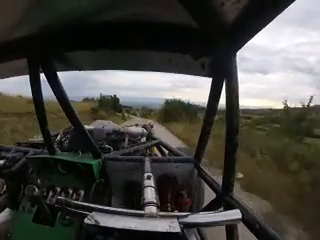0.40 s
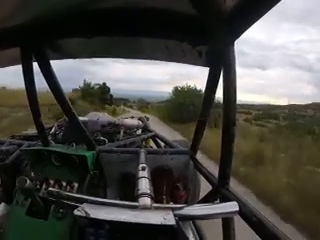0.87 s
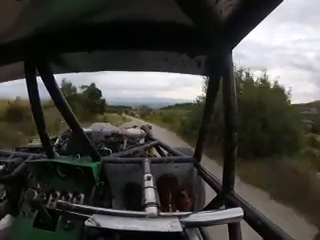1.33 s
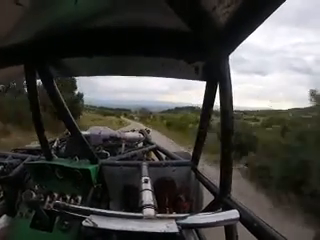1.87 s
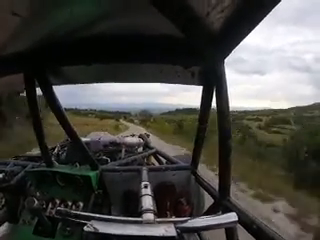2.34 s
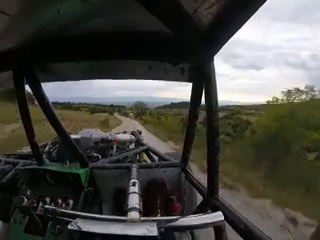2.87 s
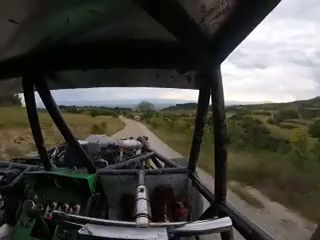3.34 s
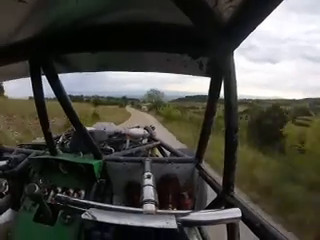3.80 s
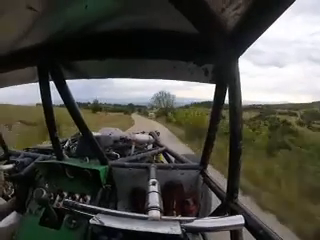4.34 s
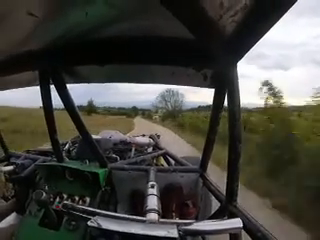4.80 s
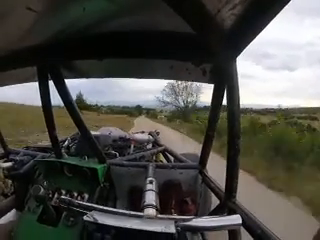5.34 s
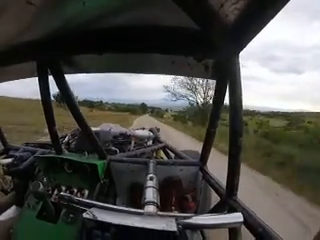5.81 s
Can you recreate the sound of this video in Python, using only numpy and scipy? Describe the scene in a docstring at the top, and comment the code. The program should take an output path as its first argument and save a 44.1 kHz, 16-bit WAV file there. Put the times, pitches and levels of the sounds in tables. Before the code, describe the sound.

Lumpy wind buffeting with thumps and sharp pops covers a faint hissing, whistling engine, which finally swells into a rough low drone.

```python
"""Headwind buffets a microphone on the roll cage of a turbocharged V8 buggy on a dirt track.
Wind: gust-shaped noise in three bands, plus timed spikes, pressure jumps and low thumps.
Engine: filtered noise hisses in ducts, blurred tones whistle and drone; the throttle opens near the end.
Drivetrain: thin blurred tones whine and squeak. Grit: single filtered impulses tick on the cage."""
import sys
import numpy as np
from scipy import signal
from scipy.fft import rfft, irfft, next_fast_len
from scipy.io import wavfile
from scipy.ndimage import map_coordinates

SR = 44100
rng = np.random.default_rng(int(sys.argv[2]) if len(sys.argv) > 2 else 0)


def master(y):
    """Save y as 16-bit WAV."""
    cut = np.clip(np.atleast_2d(y).T, -1, 1)
    pcm = np.round(cut * 32767)  # scale
    wavfile.write(sys.argv[1], SR, pcm.astype(np.int16))


def ratio_of_db(decibels):
    """Turn decibels (scalar or array-like) into linear amplitude factors; 0 dB maps to 1."""
    return 10 ** (np.asarray(decibels, float) / 20)


N = 272085


def unit(x):
    """Scales x to rms 1."""
    return x / np.sqrt(np.mean(x ** 2) + 1e-20)


def along(points, hz):
    """Interpolates (frequency [Hz], value) points on a log frequency axis."""
    f, v = np.transpose(points)
    return np.interp(np.log(hz + 1), np.log(f + 1), v)


def curves(rows):
    """Gives one value per sample for each column after the time."""
    s, *cols = np.transpose(rows)
    return [np.interp(np.arange(N) / SR, s, c) for c in cols]


def wobble(rate_hz):
    """Draws a smooth random curve with rate_hz knots a second."""
    return map_coordinates(rng.standard_normal(N // 20), [np.arange(N) * rate_hz / SR])


def filtered(x, response):
    """Multiplies the spectrum of x by a function of frequency."""
    m = next_fast_len(N + 8192)
    return irfft(rfft(x, m) * response(np.fft.rfftfreq(m, 1 / SR)), m)[:N]


def coloured(x, spectrum):
    """Shapes x by a (frequency [Hz], gain [dB]) spectrum, then scales to rms 1."""
    return unit(filtered(x, lambda hz: ratio_of_db(along(spectrum, hz))))


def whine(rows, blur_hz, steady, fade=0.14, wander_hz=0):
    """Spreads a tone by random modulation around a steady core, with a linear fade at each end."""
    hz, db = curves(rows)
    t = np.arange(N) / SR
    fade_in = np.clip((t - rows[0][0]) / fade + 1, 0, 1)
    fade_out = np.clip((rows[-1][0] - t) / fade + 1, 0, 1)
    carrier = np.exp(2j * np.pi * np.cumsum(hz + wander_hz) / SR)
    shiver = (steady + wobble(blur_hz) + 1j * wobble(blur_hz)) * carrier
    return fade_in * fade_out * ratio_of_db(db) * unit(shiver.real)


# stones on the cage: (time [s], impulse level before the filter [dB])
STONES = [(1.2472, -40.5), (1.4183, -34), (2.5689, -44.5), (3.305, -38), (4.2963, -33), (4.404, -39.5),
          (4.4816, -32), (4.654, -39), (4.7599, -45), (4.8738, -32.5), (4.8974, -32.5), (4.907, -34.5),
          (4.972, -40), (5.0026, -41.5), (5.0982, -43.5)]


def grit():
    """Tiny stones tick once, with no ring: filtered impulses."""
    ticks = np.zeros(N)
    for s, db in STONES:
        ticks[round(s * SR)] = ratio_of_db(db)
    colour = [(1500, -38.0), (4000, -4), (9000, 4.0), (12000, -7.5)]
    return filtered(ticks, lambda hz: ratio_of_db(along(colour, hz)))


# pump tone: (time [s], frequency [Hz], level [dB])
PUMP_TONE = [(0, 1657, -62), (3.1, 1657, -62), (5.0, 1657, -64), (5.3, 1657, -80)]


def pump():
    """A pump holds one steady, barely blurred note."""
    return whine(PUMP_TONE, blur_hz=6, steady=4.5)


# air bleed notes: (time [s], length [s], start frequency [Hz], end frequency [Hz], level [dB])
BLEED_NOTES = [(2.76, .26, 5590, 5640, -70), (2.92, 0.36, 5350, 5550, -66), (3.112, .24, 5660, 5790, -67),
               (3.64, 0.3, 5600, 5780, -66), (4.072, 0.11, 5690, 5740, -71)]


def air_bleed():
    """Escaping air squeaks in short rising notes."""
    out = np.zeros(N)
    for s, length_s, start_hz, end_hz, db in BLEED_NOTES:
        note = [(s, start_hz, db), (s + length_s, end_hz, db)]
        out += whine(note, blur_hz=100, steady=.7, fade=.03)
    return out


# turbine tone: (time [s], frequency [Hz], level [dB])
TURBINE_TONE = [(5.3, 2235, -72), (5.5, 2250, -56), (5.8, 2245, -57), (6.0, 2250, -54), (6.17, 2280, -55)]


def turbine():
    """The turbine sings as a blurred line."""
    return whine(TURBINE_TONE, blur_hz=90, steady=.7)


# differential tone: (time [s], frequency [Hz], level [dB])
DIFFERENTIAL_TONE = [(5.2, 788, -52), (5.27, 796, -46), (5.36, 800, -51), (5.5, 805, -49), (5.7, 808, -49),
                     (5.85, 814, -46.5), (6.0, 818, -48), (6.17, 826, -46.5)]


def differential():
    """The differential hums as a blurred line."""
    return whine(DIFFERENTIAL_TONE, blur_hz=35, steady=1.5)


# gear mesh: (time [s], mesh frequency [Hz], level before line offset and swell [dB])
GEAR_TONE = [(0, 1977, -53.5), (.58, 1985, -52), (.65, 1985, -48.5), (.72, 1985, -52), (1.35, 1990, -51.5),
             (1.5, 1985, -56), (1.75, 2005, -54), (1.97, 2030, -54), (2.04, 2045, -49.5), (2.09, 2000, -47),
             (2.14, 2045, -52.5), (2.25, 2045, -55), (2.4, 2050, -59), (3.4, 2060, -57.5), (3.9, 2060, -58),
             (4.3, 2050, -62), (4.39, 2050, -70)]
# lines made by one swell per shaft turn: (offset from mesh frequency [Hz], level offset [dB])
GEAR_LINES = [(-88, -9), (-44, -5), (0, -1), (44, -10)]


def gear_mesh():
    """Meshing teeth whine in lines a shaft rate apart, sharing a slow wander and swell."""
    wander_hz = 7 * wobble(14)
    lines = np.zeros(N)
    for offset_hz, offset_db in GEAR_LINES:
        line = [(s, hz + offset_hz, db + offset_db) for s, hz, db in GEAR_TONE]
        lines += whine(line, blur_hz=60, steady=.6, wander_hz=wander_hz)
    return ratio_of_db(.7 * wobble(9.13)) * lines


def drivetrain():
    """Sums the gear, differential, turbine, bleed and pump tones."""
    return gear_mesh() + differential() + turbine() + air_bleed() + pump()


# cab boom under load: (time [s], frequency [Hz], level [dB])
BOOM_TONE = [(4.9, 223, -31.5), (5.3, 214.5, -41.5), (5.7, 221.2, -35.5), (6.0, 227, -34), (6.17, 237, -26)]


def boom():
    """The cab booms in a low blurred tone."""
    return whine(BOOM_TONE, blur_hz=30, steady=.6)


# exhaust firing note: (time [s], frequency [Hz], level [dB])
FIRING_TONE = [(4.95, 167.6, -31), (5.3, 170.3, -30.5), (5.38, 170.4, -38), (5.55, 171.6, -31.5),
               (5.7, 173.7, -33.5), (5.87, 174, -31), (6.17, 180.9, -30.5)]


def exhaust():
    """Regular firing drones as a nearly steady tone."""
    return whine(FIRING_TONE, blur_hz=12, steady=2.5)


# wide intake whistle: (time [s], frequency [Hz], level before flicker and dips [dB])
INTAKE_BAND = [(0.0, 6405, -66), (0.63, 6550, -58.5), (1.7, 6480, -64.5), (2.22, 6440, -59.5),
               (2.9, 6440, -63), (3.95, 6620, -65), (4.9, 6420, -63.5), (5.4, 6520, -75), (6.12, 6340, -75)]
# thin wandering line in it: (time [s], frequency [Hz], level before dips [dB])
INTAKE_THIN = [(0, 6340, -64), (.3, 6270, -71), (.7, 6500, -73), (1.0, 6320, -61), (1.45, 6380, -69),
               (1.9, 6330, -71), (2.1, 6460, -68), (2.3, 6350, -63), (2.6, 6500, -62), (2.95, 6570, -71),
               (3.9, 6640, -70), (4.35, 6480, -67), (4.9, 6400, -73), (5.3, 6450, -77)]


def intake():
    """The intake whistles as a wide flickering band plus a thin wandering line."""
    band = ratio_of_db(2.2 * wobble(40)) * whine(INTAKE_BAND, blur_hz=297.5, steady=.1)
    return band + whine(INTAKE_THIN, blur_hz=59.0, steady=.4)


def ring(x, ducts):
    """Adds resonant peaks to x; a duct's gain is divided by 3."""
    def response(hz):
        peaks = sum(ratio_of_db(db) / np.sqrt(1 + (2 * (hz - centre) / width) ** 4) for centre, width, db in ducts)
        return 1 + peaks / 3
    return filtered(x, response)


# throttle: (time [s], share pulling [0-1])
PULLING_SHARE = [(0, 0), (4.9, 0), (5.4, 0.53), (6.17, 0.72)]
# hiss colours, cruising and pulling, before scaling to rms 1: (frequency [Hz], density [dB per Hz])
CRUISING_COLOUR = [(530, -22), (900, -3), (1240, -6), (1700, -7.5), (1800, -12), (1970, -7), (2320, -9.5),
                   (4550, -15), (6030, -20), (6530, -20.5), (9020, -27.5), (9970, -39.5), (13000, -74.5),
                   (21900, -120)]
PULLING_COLOUR = [(530, -44), (900, 0.5), (1250, -5.5), (1430, -4.5), (1800, -9.5), (2200, -8), (2810, -12),
                  (3260, -14.5), (4110, -21.5), (5240, -23), (7230, -34.5), (9970, -48), (13000, -81.5),
                  (21900, -120)]
# panels and ducts, cruising and pulling: (frequency [Hz], width [Hz], gain before the division by 3 [dB])
CRUISING_DUCTS = [(3340, 91, -3), (4440, 41, 7), (4615, 25, 14), (6960, 69, 11.5), (1410, 130, -1),
                  (7200, 65, 4.5)]
PULLING_DUCTS = [(1050, 50, 3), (1370, 50, 5), (1470, 50, 6), (1916, 42, 2), (2120, 54, 4), (4750, 64, 15),
                 (5110, 62, 6), (7020, 80, 5.5)]


def hiss():
    """Valve-gear noise rings in the ducts; under load it changes colour, grows and pulses with each firing."""
    pulling, = curves(PULLING_SHARE)
    clatter = ratio_of_db(0.68 * wobble(60) + 0.65 * wobble(500)) * rng.standard_normal(N)
    firing_hz = curves(FIRING_TONE)[0]
    rasp = 1 + 0.4 * np.cos(2 * np.pi * np.cumsum(firing_hz) / SR)
    cruising = coloured(ring(clatter, CRUISING_DUCTS), CRUISING_COLOUR)
    loaded = coloured(rasp * ring(clatter, PULLING_DUCTS), PULLING_COLOUR)
    return ratio_of_db(-45) * ((1 - pulling) * cruising + ratio_of_db(7.5) * pulling * loaded)


# sudden drops of hiss and intake: (time [s], depth [dB], drop time [s])
LEVEL_DIPS = [(-.05, 1.5, 0.045), (1.42, 2, 0.036), (2.2, 6, 0.21), (4.34, 5, 0.03), (4.88, 5.5, 0.23)]


def dips():
    """Gain that drops quickly at each dip, then creeps back exponentially."""
    creep_s = 1
    t = np.arange(N) / SR
    loss_db = np.zeros(N)
    for s, depth_db, drop_s in LEVEL_DIPS:
        drop = np.clip((t - s) / drop_s, 0, 1)
        loss_db += depth_db * drop * np.exp(-np.clip(t - s - drop_s, 0, None) / creep_s)
    return ratio_of_db(-loss_db)


def engine():
    """Sums hiss and intake, both dipping, with the undipped exhaust note and boom."""
    return dips() * (hiss() + intake()) + exhaust() + boom()


# low thumps of big eddies: (onset time [s], envelope peak level [dB], frequency [Hz])
EDDY_THUMPS = [(0.069, -13.5, 45.3), (0.16, -10, 67.3), (0.592, -9, 53.8), (0.679, -6, 94.2),
               (0.767, -9, 135), (0.889, -6, 94.2), (0.981, -11, 48.6), (1.149, -7.5, 45.8),
               (1.235, -11, 213), (1.306, -9.5, 201), (1.353, -10, 80), (1.469, -9, 46.4),
               (1.699, -15, 67.3), (1.929, -8.5, 114), (2.104, -13.5, 96), (2.258, -6.5, 89.6),
               (2.526, -12.5, 45.8), (2.659, -10.5, 69), (3.03, -7.5, 75.4), (3.285, -9, 118),
               (3.706, -12.5, 76), (3.825, -8.5, 45.6), (3.929, -6.5, 70.0), (4.059, -15, 45),
               (4.258, -8, 97), (4.381, -7, 87), (4.469, -9.5, 61.9), (4.635, -11, 83), (4.748, -7, 45.6)]


def thumps():
    """Each big eddy swings the pressure for about one cycle, at a random phase."""
    rise_cycles, fall_cycles = 0.508, 0.62
    out, t = np.zeros(N + SR // 10), np.arange(SR // 10) / SR
    for (s, db, hz), turn in zip(EDDY_THUMPS, rng.uniform(size=len(EDDY_THUMPS))):
        cycles = t * hz - 2 * rise_cycles  # 0 at the envelope peak
        envelope = np.exp(-(cycles / np.where(cycles < 0, rise_cycles, fall_cycles)) ** 2)
        out[round(s * SR):][:len(t)] += ratio_of_db(db) * envelope * np.cos(2 * np.pi * (cycles + turn))
    return out[:N]


# pressure jumps of bursting eddies: (time [s], level before flip and easing [dB], flip time [s])
PRESSURE_JUMPS = [(0.988, -23, .00015), (1.512, -21, 0.00016), (2.545, -27, 0.00019), (2.8, -25.5, 0.00013),
                  (2.2116, -14, 0.00017), (2.409, -20, .00015), (3.1683, -18, 0.00013),
                  (3.219, -21, .00015), (3.258, -33, .0001), (3.3045, -18.5, 0.000065), (3.338, -24, .0001),
                  (3.371, -20.5, .00007), (3.511, -19, 0.00012), (3.838, -9.5, 0.00013),
                  (4.127, -18, .00012), (4.339, -26, 0.00013), (4.6715, -19.5, 0.00013),
                  (5.478, -20, 0.00018), (5.99, -31, .0002)]


def jumps():
    """Suction builds, flips to pressure within a fraction of a millisecond and eases off."""
    ease_s = .0008
    out, t = np.zeros(N + 1024), np.arange(-512, 512) / SR
    for s, db, flip_s in PRESSURE_JUMPS:
        out[round(s * SR):][:len(t)] += ratio_of_db(db) * np.tanh(t / flip_s) * np.exp(-np.abs(t) / ease_s)
    return out[512:N + 512]


def small_snaps():
    """Rows for weaker eddies at random moments, their level tied to the wind strength."""
    count = 25
    when = rng.uniform(size=count) * (N - 1)
    luck = rng.standard_normal((count, 3))
    spike_db = curves(WIND_STRENGTH)[0][when.astype(int)] - 9 + 5.5 * luck[:, 0]
    swing_db = -5.5 + 5 * luck[:, 1]
    crackle_db = -35.5 + 7 * luck[:, 2]
    return list(zip(when / SR, spike_db, swing_db, crackle_db))


def cusp(t, rise_s, fall_s):
    """A pointed pulse: exponential rise to 1 at t = 0, exponential fall after."""
    return np.exp(np.where(t < 0, t / rise_s, -t / fall_s))


# sharpest eddies, before the port filter:
# (time [s], spike level [dB], swing over spike [dB], crackle over spike [dB])
SHARP_SNAPS = [(0.0824, -17.5, 7, -31), (0.1676, -25.5, -5, -30), (0.2119, -14, -1, -34),
               (0.297, -21, -3, -32), (0.4021, -16, -5, -46), (0.4198, -14.5, -4.5, -34),
               (0.567, -18, -6, -36), (0.611, -16.5, 1.5, -36), (0.652, -15.5, -7, -31),
               (0.6874, -13, 6.5, -40), (0.71, -24, -2, -38), (0.769, -15.5, -3, -34),
               (0.785, -20, 3.5, -38), (0.8, -12.5, 1, -32), (0.892, -20.5, -3, -35), (0.902, -17, 6, -43),
               (0.9863, -11, -4, -35), (0.998, -12.5, 8, -33), (1.062, -21, -3, -35),
               (1.155, -17.5, -3, -39), (1.1687, -19.5, 10.5, -36), (1.2655, -17.5, 9, -45),
               (1.329, -9.5, 1, -34), (1.3799, -15.5, -5.5, -31), (1.459, -22, 7, -36),
               (1.482, -23, -2.5, -39), (1.5105, -10.5, -5, -42), (1.55, -20.5, 1, -36),
               (1.59, -23.5, 5.5, -36), (1.635, -17, -3.5, -24.5), (1.7203, -12, -3, -35.5),
               (1.7951, -16.5, -8.5, -35), (1.822, -18, 5, -34.5), (1.867, -18.5, 4, -31),
               (1.918, -20.5, -1, -35), (2.021, -15.5, -17, -26), (2.062, -17, -9, -28),
               (2.1106, -12, -8, -52), (2.1298, -16, -2.5, -36), (2.1675, -12, -17, -24.5),
               (2.182, -13.5, -12.5, -31.5), (2.213, -10, -7.5, -29.5), (2.255, -25.5, -3, -27),
               (2.2754, -11, 3.5, -25), (2.289, -22, -7, -23), (2.3235, -17, 4, -30), (2.35, -19, -11, -34),
               (2.3745, -22.5, -4, -32), (2.4088, -12.5, -2, -29), (2.428, -20, -13, -27),
               (2.4885, -18.5, -10, -25.5), (2.514, -26.5, 0.5, -34), (2.544, -16.5, -8, -39),
               (2.5867, -24, 14, -21.5), (2.6536, -15, -2, -29), (2.681, -22, -10, -19),
               (2.733, -17.5, -7, -32.5), (2.7535, -16.5, -3, -26), (2.798, -16.5, -16, -33),
               (2.8472, -18.5, -13, -28), (2.8962, -14.5, 1, -31), (2.956, -27, -23, -8),
               (3.0414, -15, 8, -20), (3.092, -19, -5, -24), (3.166, -7.5, -4.5, -23),
               (3.195, -17, -1.5, -28), (3.2163, -13.5, -11, -28), (3.246, -17.5, -1, -30),
               (3.299, -10.5, -12, -27.5), (3.303, -12, 5.5, -24), (3.322, -17.5, -13, -17),
               (3.335, -28, -21, -16.5), (3.3667, -13.5, 4.5, -29), (3.4065, -21, -4.5, -16.5),
               (3.42, -23.5, -10, -24.5), (3.463, -15.5, 2.5, -27.5), (3.472, -16, -5, -23.5),
               (3.509, -14, -15, -25.5), (3.555, -35, -4, -30), (3.585, -25, -6, -32),
               (3.6404, -18, -2, -37), (3.6527, -13, -7, -33), (3.717, -21, -6, -30),
               (3.748, -13, -9, -19.5), (3.778, -13.5, -6, -38), (3.8375, -10, 4.5, -31),
               (3.8606, -16.5, 9.5, -38), (3.925, -23.5, -19, -32), (3.9446, -8, -3, -38.5),
               (3.9858, -11.5, 0.5, -43), (4.021, -19.5, -8.5, -18), (4.0974, -10.5, -11, -39),
               (4.1265, -11.5, -11, -33), (4.1454, -11, -14, -36), (4.069, -21.5, 0, -24),
               (4.1045, -9.5, -1, -28), (4.176, -27, -12, -19), (4.24, -16, 1, -24), (4.302, -13.5, 1, -34),
               (4.223, -15.5, 1, -33), (4.257, -21, -9, -30), (4.268, -14.5, -2.5, -29),
               (4.2798, -13.5, -5.5, -32.5), (4.3379, -18, 6.5, -32), (4.358, -32, -3, -29),
               (4.376, -29, -9, -32), (4.4005, -13, 1, -33), (4.45, -21, 4.5, -32), (4.482, -21.5, 5, -34),
               (4.564, -18, 1, -29), (4.575, -20, -11, -28), (4.648, -17, -13, -30),
               (4.6713, -14, -10, -16.5), (4.688, -17, 0.5, -35), (4.7057, -9.5, -7.5, -31),
               (4.7591, -17.5, 7, -46), (4.8105, -20, 3.5, -31.5), (4.84, -17.5, 0, -29.5),
               (4.892, -15.5, 1.5, -49), (5.007, -22.5, -6, -32), (5.048, -19, -7, -36),
               (5.091, -17.5, -9, -25.5), (5.186, -19, -3, -27), (5.257, -18, -9, -37),
               (5.455, -22, 4, -35), (5.478, -16, -4, -21), (5.615, -21, -18, -32), (5.64, -20, -11, -29),
               (5.716, -22.5, -9, -36), (5.818, -18.5, -4.5, -37), (5.9504, -26.5, 0, -30)]


def snaps():
    """A pointed pressure spike at the port, a slower swing and a puff around it, a short crackle at its tip."""
    push_share = .68  # the rest are suction
    out, t = np.zeros(N + 2048), np.arange(-1024, 1024) / SR
    rows = SHARP_SNAPS + small_snaps()
    luck = rng.uniform(size=(len(rows), 4))
    puffs = coloured(rng.standard_normal(N), TEARING_COLOUR)
    crackle_colour = [(900, -21.5), (1800, 6.0), (4500, -13.0), (7000, -28.0), (10000, -39.0)]
    frying = coloured(rng.standard_normal(N), crackle_colour)
    for (s, db, swing_db, crackle_db), (a, b, turn, way) in zip(rows, luck):
        at = round(turn * (N - len(t)))  # random stretch of noise
        spike = cusp(t, 0.00028 + 0.00035 * a, 0.0006 + 0.0008 * b)
        phase = (90 + 130 * b) * t + 0.08 + 0.22 * (turn - .5)
        swing = cusp(t, 0.0027, 0.0054) * np.cos(2 * np.pi * phase)
        puff = 0.38 * cusp(t, 0.0028, 0.004) * puffs[at:][:len(t)]
        crackle = ratio_of_db(crackle_db) * cusp(t, 0.00038, 0.0019) * frying[at:][:len(t)]
        sign = 1 if way < push_share else -1
        out[round(s * SR):][:len(t)] += ratio_of_db(db) * (sign * (spike + ratio_of_db(swing_db) * swing) + puff + crackle)
    # the port vents slow pressure
    return filtered(out[1024:N + 1024], lambda hz: 1 / (1 + (80 / (hz + 1)) ** 4))


# headwind at the microphone: (time [s], strength before layer offsets [dB])
WIND_STRENGTH = [(0.0, -16.5), (0.03, -16.5), (0.15, -26), (0.17, -15), (0.31, -22), (0.41, -14),
                 (0.45, -20.5), (0.58, -24.5), (0.6, -17), (1.1, -19), (1.18, -14), (1.22, -24),
                 (1.25, -12), (1.29, -21), (1.37, -15.5), (1.41, -21), (1.49, -17), (1.67, -20),
                 (1.73, -16), (2.15, -16), (2.25, -17), (2.4, -17), (2.47, -32), (2.52, -19), (2.59, -13.5),
                 (2.63, -30), (2.68, -18), (2.84, -18.5), (2.92, -14.5), (3.16, -19.5), (3.2, -15.5),
                 (3.27, -21), (3.3, -18.5), (3.54, -19), (3.59, -20), (3.69, -19.5), (3.73, -18),
                 (3.75, -17), (4.33, -13), (4.36, -21), (4.42, -15), (4.45, -21), (4.48, -16), (4.52, -23),
                 (4.78, -14.5), (5.16, -28.5), (5.19, -23), (5.39, -29.5), (5.48, -19.5), (5.65, -25),
                 (6.14, -17), (6.17, -30)]
# layer balance: (time [s], rumble over mean strength [dB], tearing over mean strength [dB])
WIND_BALANCE = [(0, -4.5, -19.5), (.7, -3, -19), (1.3, -1, -19.5), (1.9, -2, -18), (2.4, -2, -19),
                (3, -3, -15.5), (3.6, -0.5, -13), (4.15, -4, -16), (4.7, -2, -12.5), (5.1, -0.5, -12.5),
                (5.7, -2.5, -14.5), (6.17, -7.5, -15.5)]
# lumpiness of the airflow: (time [s], share [0-1])
LUMPINESS = [(0, 0.87), (4.85, 0.85), (5.1, 0.62), (6.17, 0.3)]
# layer colours before scaling to rms 1: (frequency [Hz], density [dB per Hz])
RUMBLE_COLOUR = [(12, -38.5), (20, 2), (49, 2), (82, 0.5), (160, -13), (210, -27.5), (350, -120)]
FLUTTER_COLOUR = [(65, -10.5), (110, -2.5), (205, -2.5), (237, -5), (420, -21.5), (550, -24.5), (920, -120)]
TEARING_COLOUR = [(190, -21), (330, 1.5), (744, -10.5), (1350, -24), (2060, -30.5), (2500, -45),
                  (3250, -58), (5500, -120)]


def wind():
    """Big eddies rumble; smaller ones arrive in clumps, and the smallest tear past as sparse spikes."""
    gust_hz = 14
    strength_db, = curves(WIND_STRENGTH)
    rumble_db, tearing_db = curves(WIND_BALANCE)
    lumpy, = curves(LUMPINESS)
    mean_db = strength_db.mean()
    swing_db = strength_db - mean_db + 0.8 * lumpy * wobble(gust_hz)

    def level(follows, over_db):
        """Layer gain: a share of the common gust swing plus the layer's own unevenness."""
        return ratio_of_db(mean_db + over_db + follows * swing_db + 1.1 * wobble(gust_hz))

    clump = lumpy * np.tanh(wobble(70) / 2) * 2  # lifts all layers, the high ones most
    rumble = coloured(ratio_of_db(2.2 * clump) * rng.standard_normal(N), RUMBLE_COLOUR)
    flutter_gain = ratio_of_db(3.1 * clump + 1.5 * lumpy * wobble(140))
    flutter = coloured(flutter_gain * rng.standard_normal(N), FLUTTER_COLOUR)
    hits = rng.uniform(size=N) < 700 / SR  # about 700 a second
    sparse = hits * ratio_of_db(4.9 * lumpy * np.minimum(rng.exponential(size=N), 2.5))
    spikes = 0.54 * rng.standard_normal(N) + unit(sparse * rng.normal(0.31, 1, N))
    tearing = coloured(ratio_of_db(3.6 * clump) * spikes, TEARING_COLOUR)
    return level(0.8, rumble_db) * rumble + level(0.66, -5) * flutter + level(0.57, tearing_db) * tearing


def scene():
    """Sums the machine and the wind on the port, one channel."""
    machine = grit() + drivetrain() + engine()
    return (machine + thumps() + jumps() + snaps() + wind())[None]


def roll_off(x):
    """The treble ends steeply here."""
    return signal.sosfilt(signal.butter(12, 10120, fs=SR, output="sos"), x)


def record(dry):
    """Softly squashes the loudest gusts, then rolls off the top."""
    ceiling, top_hz = .7, 13500
    squashed = dry[0] / (1 + np.abs(dry[0] / ceiling) ** 4) ** (1 / 4)
    rolled_off = filtered(squashed, lambda hz: 1 / (1 + (hz / top_hz) ** 16))
    return roll_off(rolled_off[None])


dry = scene()
out = record(dry)
master(out)
```